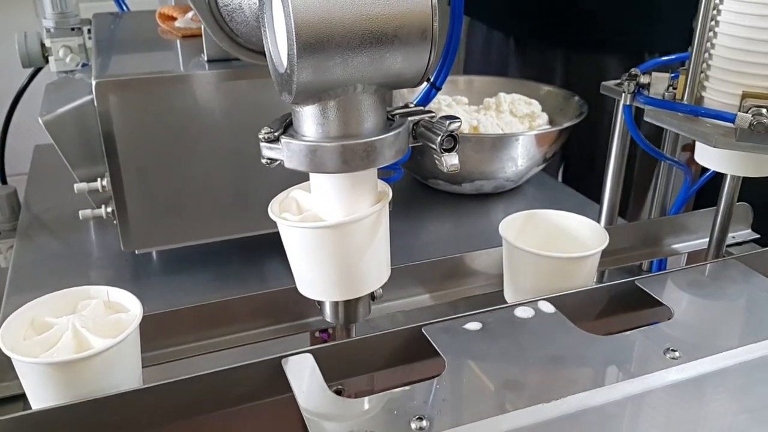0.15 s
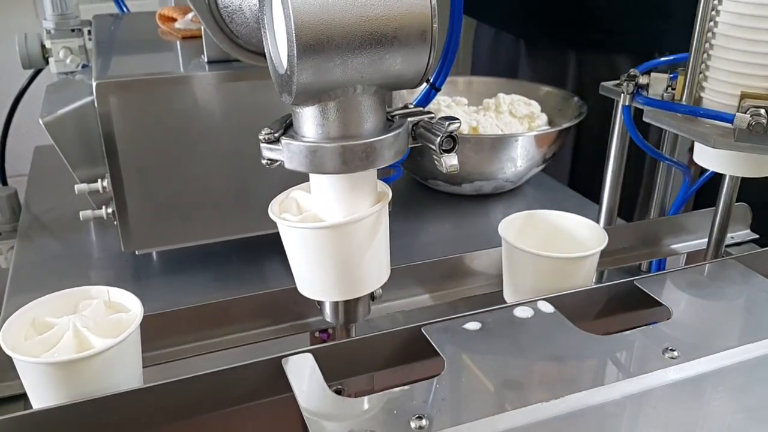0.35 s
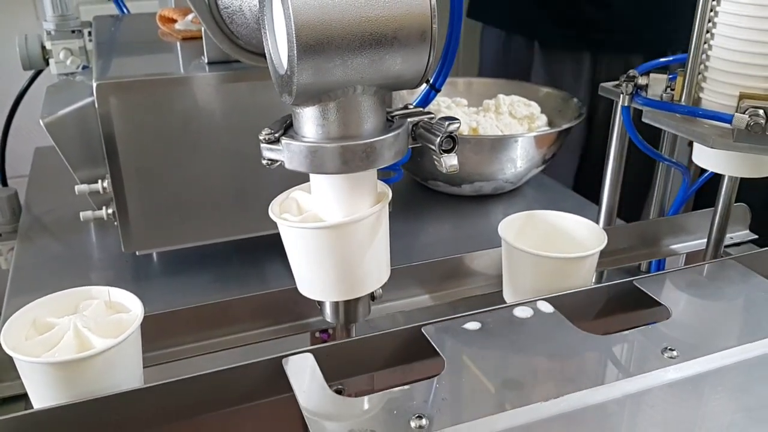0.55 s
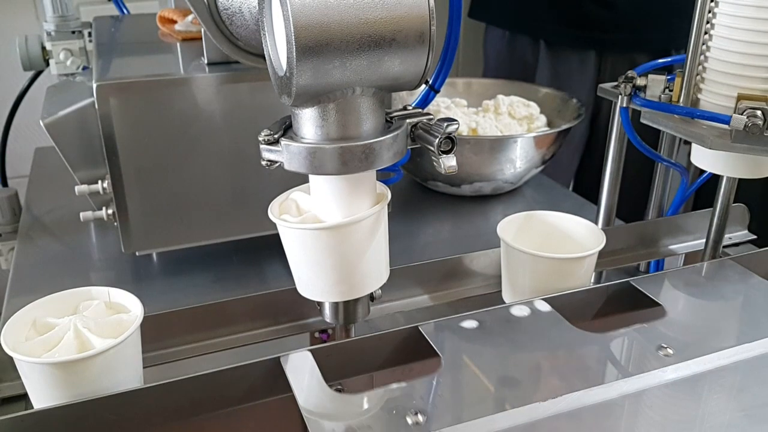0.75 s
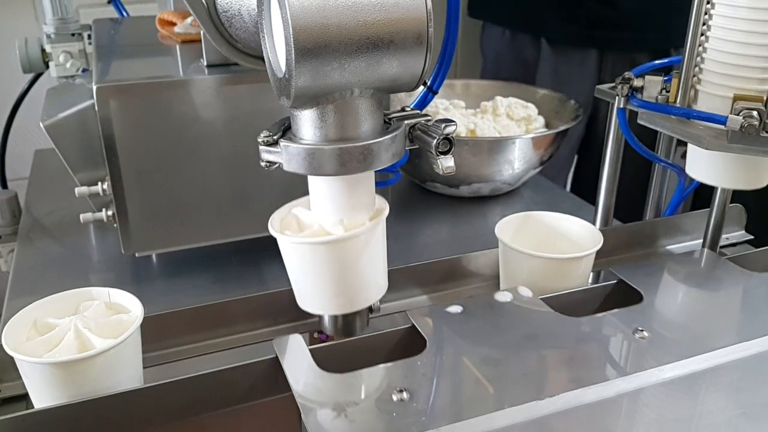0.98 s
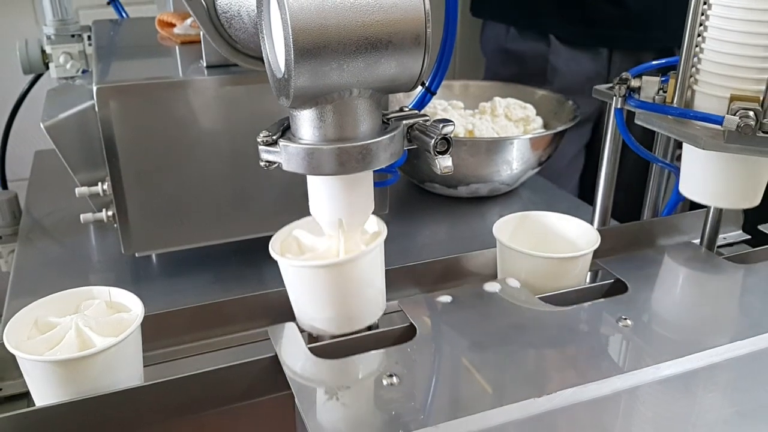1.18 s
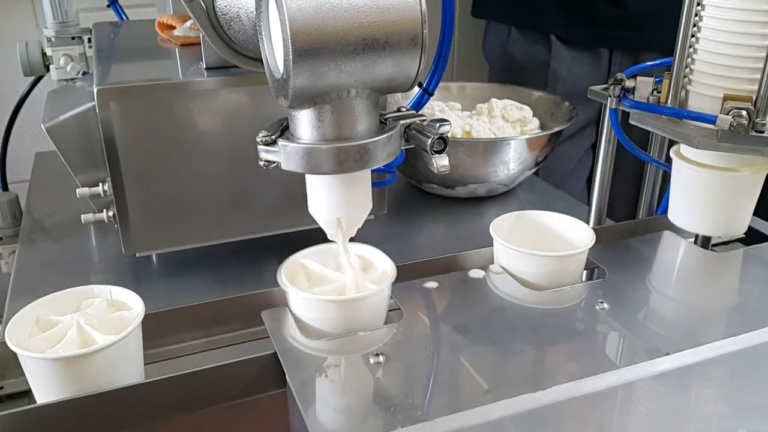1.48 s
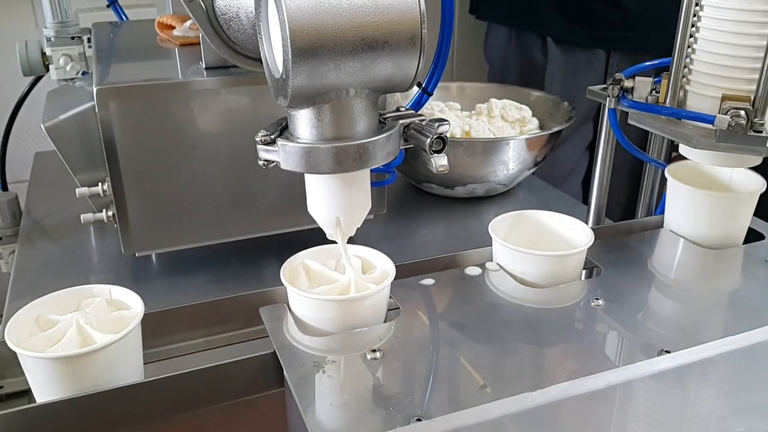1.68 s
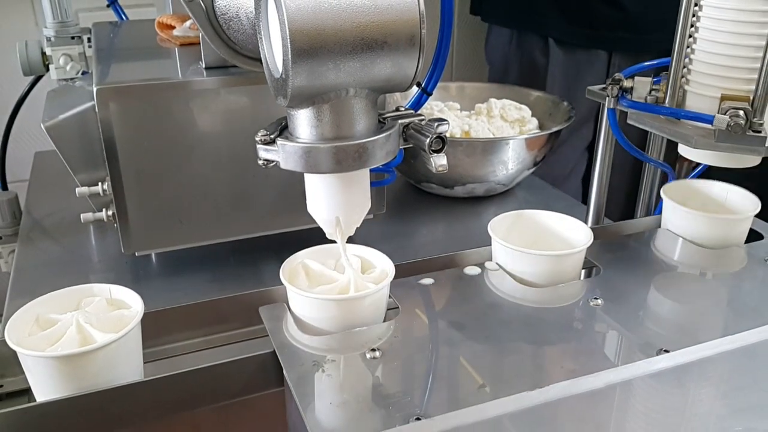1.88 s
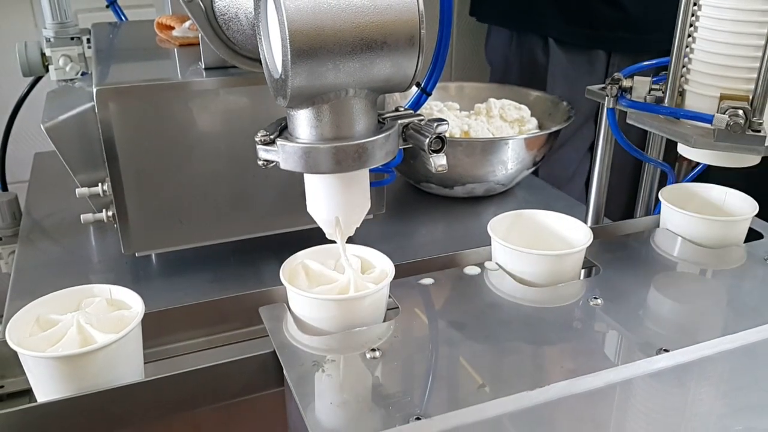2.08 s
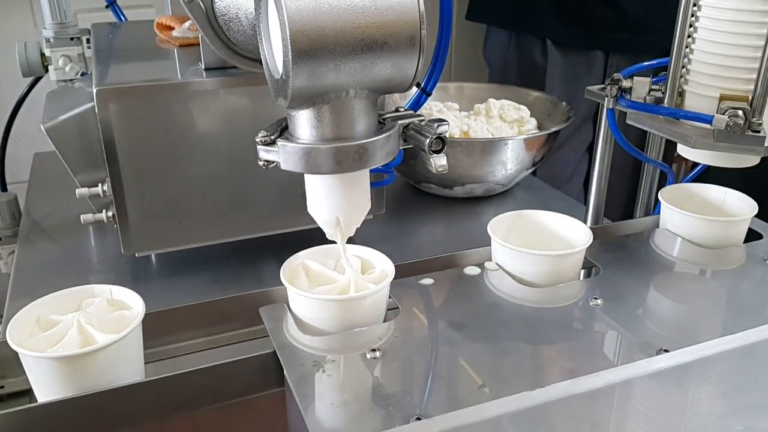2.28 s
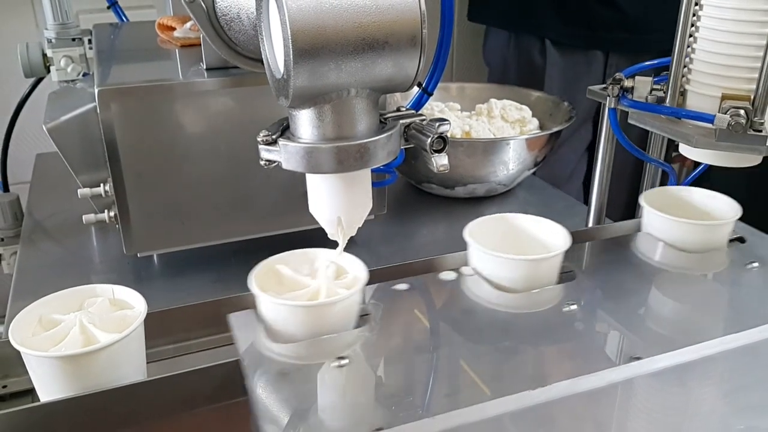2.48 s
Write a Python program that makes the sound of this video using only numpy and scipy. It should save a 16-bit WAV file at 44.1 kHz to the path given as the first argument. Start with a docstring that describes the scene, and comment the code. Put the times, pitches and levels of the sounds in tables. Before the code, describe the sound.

A pneumatic cup-filling machine rumbles as a knock fades at 0 s. Cylinders thump and rattle at 0.2-0.3 s, opening a bright, slightly whistling air hiss until 1.8 s. A hollow metal clunk lands at 0.8 s, softer thuds at 1.4 and 1.65, with scraping; another clunk at 1.8 ends the hiss. Latch clacks at 2.0, ticks, knocks and an air spit at 2.2-2.3 follow, over reverberant workshop noise.

```python
"""A fading knock over drive rumble comes first, then one cycle of a pneumatic cup-filling machine in a
hard-walled workshop. Cylinders hit their stops: decaying modes plus dense noise bursts. A latch clacks, valves
tick and spit. Exhaust air hisses for a second and a half: coloured noise with narrow peaks. The drive hums,
the cup carrier scrapes. The room adds a short tail to the bursts and the hiss; steady workshop noise
lies underneath."""
import sys
import numpy as np
from scipy import signal
from scipy.fft import rfft, irfft
from scipy.io import wavfile

SR = 44100
rng = np.random.default_rng(int(sys.argv[2]) if len(sys.argv) > 2 else 0)


def generate_wav(signal):
    """Clip the signal to [-1, 1] and save it as 16-bit WAV at the path in sys.argv[1]."""
    frames = np.transpose(np.atleast_2d(signal))
    scaled = np.clip(frames, -1, 1) * 32767
    pcm = np.round(scaled).astype(np.int16)
    wavfile.write(sys.argv[1], SR, pcm)


N = 116865
T = np.arange(N) / SR   # s
HZ = np.maximum(np.fft.rfftfreq(N, 1 / SR), 1)

# All spectra and modes: relative dB. T60: time to fall 60 dB. Pan: left minus right, dB.
# Cylinder stops: (time [s], rise [s], bass thump [dB], dull thud [dB], frame ring [dB],
# panel rattle before its modal/dense trims [dB], steel clatter [dB], bright crack [dB])
KNOCKS = [(0.0, 0.0022, -42, -44, -50, -33, -28.5, -45.5), (0.205, 0.0014, -26, -41, -68, -32, -34, -36),
          (0.22, 0.0046, -21, -30, -36, -31, -26.5, -32.5),
          (0.297, 0.0046, -38, -24.5, -17.5, -21, -37, -44),
          (0.65, 0.0065, -24.5, -29.5, -40, -43, -33, -50), (0.79, .012, -33, -27, -21, -18.5, -23.5, -22),
          (0.825, 0.004, -36, -26, -28, -24, -35, -40), (1.41, 0.0064, -37, -21.5, -33, -31, -54, -55),
          (1.666, 0.0065, -46, -33, -38, -50, -38, -55), (1.798, 0.0066, -34, -27.5, -25.5, -20, -20, -34),
          (2.208, .001, -47, -44, -53, -32, -30, -38), (2.222, 0.0023, -29.5, -36, -54, -35, -30.5, -32),
          (2.303, 0.0068, -60, -41, -26, -29, -38, -33)]
# Ringing modes of base, frame and panels: (frequency [Hz], level [dB], T60 [s])
THUMP_MODES = [(126, -11.5, 0.057), (157.9, -1.5, 0.14), (181.7, -11.5, 0.15)]
FRAME_MODES = [(258.3, -12, 0.21), (296, -15.5, 0.27), (385, -6.5, 0.3), (412, -0.5, 0.31),
               (534, -8.5, 0.36), (772, -25.5, 0.38), (2128, -16, 0.62), (2203, -33, 0.41)]
PANEL_MODES = [(488, -3.5, 0.3), (537.3, -0.5, 0.56), (621, -2, 0.24), (689, 0, 0.39), (722, -6, 0.28),
               (769, -3, 0.32), (930, 0, 0.27), (1000, -1, 0.18), (1047, 0, 0.29), (1152, -1, 0.24),
               (1487, -8.5, .3), (2130, -13, .35)]
# Dense knock spectra: (frequency [Hz], level per Hz [dB])
THUD_SPECTRUM = [(30, -29), (60, -16), (90, -10.5), (150, -5), (230, 0), (330, 0), (430, 1), (600, -9.5),
                 (1100, -22), (3000, -51)]
PANEL_SPECTRUM = [(30, -42), (85, -4.5), (200, -13.5), (330, -7), (480, -0.5), (680, -1.5), (820, -3.5),
                  (980, 0.5), (1150, -7.5), (1600, -14), (4000, -62)]
CLATTER_SPECTRUM = [(200, -38), (800, -2), (1200, 1.5), (1520, 2.5), (1750, -4.5), (2150, 1), (2700, -12),
                    (5000, -16), (16000, -61)]
CRACK_SPECTRUM = [(700, -17), (2200, 3.5), (3800, -5), (6200, 3.5), (8000, -9), (11000, -6), (16000, -14)]
THUD_T60_S, PANEL_T60_S, CLATTER_T60_S, CRACK_T60_S = 0.24, 0.31, 0.17, 0.1
THUMP_EXTRA_RISE_S, KNOCK_PAN_DB, CRACK_PAN_DB = 0.0094, 3, -5

# Latch contacts: (time [s], level [dB])
CLACKS = [(1.589, -26.5), (2.018, -20.5), (2.027, -18), (2.044, -24.5)]
# Latch part modes: (frequency [Hz], level [dB], T60 [s])
LATCH_MODES = [(545, -6, 0.22), (1070, -3, 0.2), (1198, -1, 0.16), (1355, 0, 0.16), (1445, 4, 0.14),
               (1630, -3, 0.22), (2060, -13.5, 0.18), (3510, -13.5, 0.38), (4048, -17, 0.2)]
# Latch dense spectrum: (frequency [Hz], level per Hz [dB])
LATCH_SPECTRUM = [(200, -34), (600, -16), (850, -12), (1300, 3.5), (1700, -1.5), (2600, -19), (3900, -3),
                  (5000, -15), (6300, -14), (8000, -37), (16000, -42)]
LATCH_T60_S, LATCH_PAN_DB, LATCH_RING_DB = 0.052, 2, -3.5

# Valve switching: (time [s], level [dB])
TICKS = [(1.987, -22.5), (2.209, -27), (2.309, -14)]
# Valve air spits: (time [s], rise [s], level [dB])
SPITS = [(0.289, 0.0042, -30.5), (0.791, 0.0089, -27), (1.986, 0.00084, -26), (2.298, .003, -32),
         (2.309, .003, -19.5)]
# Tick and spit spectrum: (frequency [Hz], level per Hz [dB])
SPIT_SPECTRUM = [(500, -25), (1800, 4), (3000, -1), (4800, 4.5), (6500, 3.5), (8500, -3.5), (11500, -3),
                 (14000, -19), (16000, -9)]
TICK_T60_S, SPIT_T60_S = 0.013, 0.12

# Exhaust jet spectrum: (frequency [Hz], level per Hz [dB])
HISS_SPECTRUM = [(880, -34), (1500, -19.5), (1870, -22), (2020, -15), (2740, -6), (3250, -7), (3730, -6),
                 (4330, -4), (5220, -8.5), (6060, 1), (6960, -5), (7690, -14), (8490, -18.5), (9950, -16),
                 (11800, -26), (13000, -15), (14500, -14), (15400, -22), (16000, -39)]
# Narrow peaks in the hiss from reflections between steel panels: (frequency [Hz], width [Hz], boost [dB])
HISS_PEAKS = [(2810, 150, 2), (4160, 17, -0.5), (4300, 21, 7.5), (4340, 28, 11), (4440, 20, 7),
              (4598, 43, 10.5), (5000, 28, 1), (5458, 20, -2), (6050, 54, 7.5), (6200, 20, 5.5),
              (6330, 26, 2), (6770, 20, 2), (6988, 35, 5.5)]
# Jet pan: (frequency [Hz], left minus right [dB])
HISS_PAN = [(1500, 6), (2300, 3), (2950, -2), (3300, 16), (3750, -12.5), (4400, -3.5), (5000, -0.5),
            (5400, -7), (5950, -14), (6900, -16), (7700, -1), (8500, 1), (15000, -1.5)]
OPEN_S, CLOSE_S, OPENING_S, CLOSING_T60_S = 0.3, 1.8115, 0.019, 0.22
HISS_DB, FLUTTER_DB, HISS_SCATTER_T60_S, HISS_SCATTER_SHARE = -22, 0.68, 0.087, 0.97

# Drive rumble spectrum: (frequency [Hz], level per Hz [dB])
RUMBLE_SPECTRUM = [(30, -33), (70, -18), (120, -1.5), (140, -9), (160, 0), (200, -1.5), (280, -3.5),
                   (390, -8.5), (520, -7.5), (900, -10.5), (1500, -14), (2500, -15), (6000, -48)]
# Drive rumble level: (time [s], level [dB])
RUMBLE_LEVEL = [(0, -39), (0.18, -42.5), (0.32, -39.5), (1.35, -39.5), (1.8, -35), (1.86, -60),
                (2.15, -53.5), (2.27, -39), (2.4, -49), (2.65, -53)]
HUM_HZ, HUM_WIDTH_HZ, HUM_DB = 157.6, 13.4, -6.5   # dB re rumble
# Cup carrier slide level: (time [s], level [dB])
SLIDE_LEVEL = [(1.38, -68), (1.48, -37), (1.78, -39), (1.95, -37), (2.02, -41.5), (2.2, -51)]
# Slide spectrum: (frequency [Hz], level per Hz [dB])
SLIDE_SPECTRUM = [(100, -19), (250, 0), (550, 2.5), (950, 9), (1400, 2), (2200, -1), (4200, -1.5),
                  (6500, -2), (9000, -22), (16000, -32)]

# Workshop noise spectrum: (frequency [Hz], level per Hz [dB])
FLOOR_SPECTRUM = [(25, -32), (60, -17), (160, -6), (260, -7.5), (450, -0.5), (800, -1.5), (1300, -5.5),
                  (2100, -7), (3000, -15), (6000, -19), (8500, -29.5), (16000, -22.5)]
# Stereo likeness: (frequency [Hz], left-right correlation [-1..1])
LIKENESS = [(60, 0.91), (200, 0.96), (400, 0.84), (700, 0.53), (1200, 0), (2500, 0.12), (16000, 0)]
FLOOR_DB, CUTOFF_HZ, GRAIN_DB = -42.5, 15800, 1.5
ROOM_T60_S, ROOM_TREBLE_T60_S, ROOM_BUILD_S = 0.44, 0.42, 0.013


def knocks():
    """Cylinders hit their stops: the base thumps, the frame rings, panels and fittings rattle."""
    s, rise, thump, thud, frame, panel, clatter, crack = np.transpose(KNOCKS)
    body = ring(list(zip(s, rise + THUMP_EXTRA_RISE_S, thump)), THUMP_MODES, vary_db=0.5)
    body += ring(list(zip(s, rise, frame)), FRAME_MODES, vary_db=4.5)
    body += ring(list(zip(s, rise, panel - 2.5)), PANEL_MODES, vary_db=1.5)
    body += bursts(zip(s, rise, thud), THUD_SPECTRUM, THUD_T60_S, room_db=-26)
    body += bursts(zip(s, rise, panel - 3.5), PANEL_SPECTRUM, PANEL_T60_S, room_db=-8)
    body += bursts(zip(s, rise, clatter), CLATTER_SPECTRUM, CLATTER_T60_S, room_db=-7)
    cracks = bursts(zip(s, rise, crack), CRACK_SPECTRUM, CRACK_T60_S, room_db=-5,
                    room_t60=ROOM_TREBLE_T60_S)
    return pan(KNOCK_PAN_DB) * body + pan(CRACK_PAN_DB) * cracks


def latch():
    """A small steel part snaps home and bounces: short noise bursts over its own modes."""
    rows = [(s, 0, db) for s, db in CLACKS]
    clack = bursts(rows, LATCH_SPECTRUM, LATCH_T60_S, room_db=-14)
    ringing = from_db(LATCH_RING_DB) * ring(rows, LATCH_MODES, vary_db=0.0)
    return pan(LATCH_PAN_DB) * (clack + ringing)


def valves():
    """The valves tick as they switch and let out short bright spits of air."""
    ticks = bursts([(s, 0, db) for s, db in TICKS], SPIT_SPECTRUM, TICK_T60_S, room_db=-23)
    spits = bursts(SPITS, SPIT_SPECTRUM, SPIT_T60_S, room_db=-6.5, room_t60=ROOM_TREBLE_T60_S)
    return pan(-2.5) * (ticks + spits)


def exhaust():
    """A jet coloured by narrow peaks and scattered by the panels; once shut, a duller tail lingers."""
    peaks_db = sum(db * peak(hz, width) for hz, width, db in HISS_PEAKS)
    colour = from_db(over_hz(HISS_SPECTRUM) + peaks_db)
    colour = colour * scatter(HISS_SCATTER_T60_S, HISS_SCATTER_SHARE)
    flutter = from_db(FLUTTER_DB * noise(peak(0, 42) ** 2)[0])
    opening = 1 - np.exp(-np.maximum(T - OPEN_S, 0) / OPENING_S)
    closing = from_db(-60 * np.maximum(T - CLOSE_S, 0) / CLOSING_T60_S)
    jet = opening * closing * flutter * noise(colour * pan(over_hz(HISS_PAN)))
    dull_colour = colour * pan(-7) / (1 + (HZ / 6500) ** 4)
    tail = decay(CLOSE_S, 0.037, ROOM_T60_S) * noise(dull_colour)
    return from_db(HISS_DB) * (jet + from_db(-8) * tail)


def drive():
    """The drive rumbles and hums unevenly: broadband noise plus a narrow noise band."""
    rumble = coloured(RUMBLE_SPECTRUM)
    hum = from_db(HUM_DB) * noise(peak(HUM_HZ, HUM_WIDTH_HZ))
    return pan(2.7) * level_over_time(RUMBLE_LEVEL) * (rumble + hum)


def carrier_slide():
    """The cup carrier scrapes along late in the stroke: friction as coloured noise."""
    return pan(1.0) * level_over_time(SLIDE_LEVEL) * coloured(SLIDE_SPECTRUM)


def workshop():
    """Steady background noise of the workshop."""
    return pan(1.5) * from_db(FLOOR_DB) * coloured(FLOOR_SPECTRUM)


def ring(rows, modes, vary_db):
    """Each (s, rise, dB) strikes every mode at random phase; LIKENESS sets the left-right phase lag."""
    out = np.zeros((2, N))
    total = np.sqrt(sum(from_db(mode[1]) ** 2 for mode in modes) / 2)
    spread = np.arccos(np.clip(over_hz(LIKENESS), -1, 1))
    for k, (hz, mode_db, t60) in enumerate(modes):
        swing = 0
        for s, rise, db in rows:
            strike = from_db(db + mode_db + vary_db * rng.normal())
            phase = np.exp(2j * np.pi * rng.random())
            swing = swing + strike * phase * decay(s, rise, t60)
        lag = np.interp(hz, HZ, spread) * (-1) ** k * np.array([[.5], [-.5]])
        out += (swing * np.exp(2j * np.pi * hz * T) * np.exp(1j * lag)).real
    return out / total


def bursts(rows, colour, t60, room_db, room_t60=ROOM_T60_S):
    """Dense, grainy ringing set off at each (s, rise, dB), with the room's smooth tail; powers add."""
    rows = list(rows)
    grain = rms_one(from_db(GRAIN_DB * noise(peak(0, 520) ** 2)[0]))
    direct = sum((from_db(db) * decay(s, rise, t60)) ** 2 for s, rise, db in rows)
    room = sum((from_db(db + room_db) * decay(s, rise + ROOM_BUILD_S, room_t60)) ** 2
               for s, rise, db in rows)
    ripple = np.where(HZ > 1000, scatter(t60=0.15, share=0.68), 1)
    return np.sqrt(direct * grain ** 2 + room) * noise(from_db(over_hz(colour)) * ripple)


def scatter(t60, share):
    """Fine peaks and dips from quick reflections between steel panels, different on each side."""
    reflections = rng.standard_normal((2, N)) * decay(0, 0, t60)
    ripple = rms_one(np.abs(rfft(reflections)))
    share = np.clip(share, 0, 1)
    return np.sqrt(1 - share + share * ripple ** 2)


def noise(gain):
    """Unit-power stereo noise of a given colour, alike in the bass and diffuse in the treble."""
    mid, side = rfft(rng.standard_normal((2, N)))
    alike = np.clip(over_hz(LIKENESS), -1, 1)
    stereo = np.sqrt(1 + alike) * mid + np.sqrt(1 - alike) * side * [[1], [-1]]
    return rms_one(irfft(gain * stereo, N))


def coloured(points):
    """Stereo noise following a spectrum table."""
    return noise(from_db(over_hz(points)))


def decay(start, rise, t60):
    """Linear rise, at least 0.1 ms, then exponential fall."""
    rise = max(rise, 1e-4)
    attack = np.clip((T - start) / rise, 0, 1)
    return attack * from_db(-60 * np.maximum(T - start - rise, 0) / t60)


def peak(hz, width):
    """Peak curve: 1 at hz, one half at width / 2 to either side."""
    return 1 / (1 + (2 * (HZ - hz) / width) ** 2)


def pan(db):
    """Left and right gains for a level difference, at unit mean power."""
    gains = from_db(np.array([[.5], [-.5]]) * db)
    return gains / np.sqrt(np.mean(gains ** 2, axis=0))


def over_hz(points):
    """Read a table at every frequency, on a log axis."""
    hz, value = np.transpose(points)
    return np.interp(np.log(HZ), np.log(hz), value)


def level_over_time(points):
    """Gain at every sample, linear in dB between (s, dB) points."""
    return from_db(np.interp(T, *np.transpose(points)))


def from_db(db):
    """Decibels to gain."""
    return 10 ** (np.asarray(db) / 20)


def rms_one(x):
    """Scale to unit power."""
    return x / np.sqrt(np.mean(x ** 2) + 1e-20)


def scene():
    """The machine over the steady noise of the workshop."""
    machine = knocks() + latch() + valves() + exhaust() + drive() + carrier_slide()
    return machine + workshop()


def record(dry):
    """Cut the top steeply: 12th-order Chebyshev low-pass, 0.3 dB ripple."""
    low_pass = signal.cheby1(12, .3, CUTOFF_HZ, fs=SR, output="sos")
    return signal.sosfilt(low_pass, dry)


dry = scene()
out = record(dry)
generate_wav(out)
```